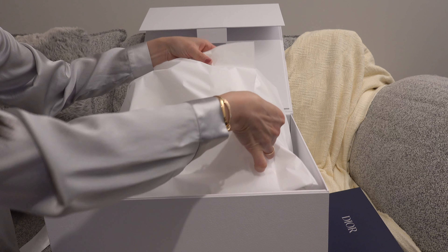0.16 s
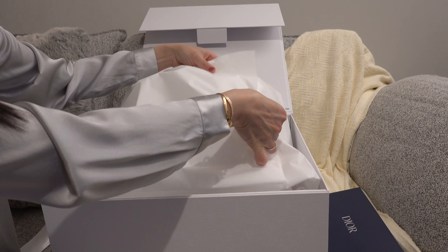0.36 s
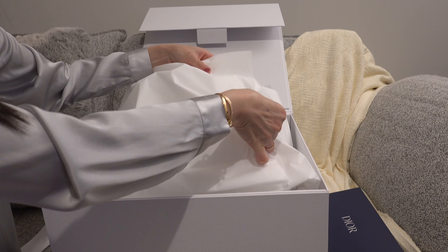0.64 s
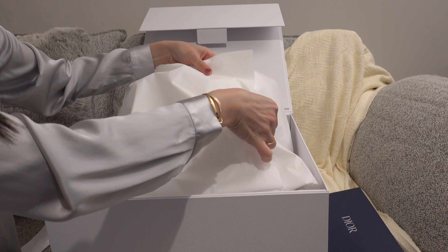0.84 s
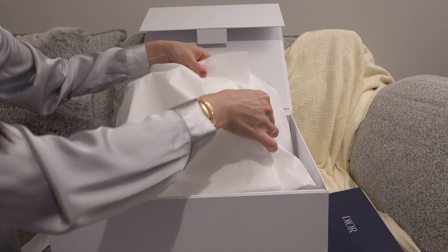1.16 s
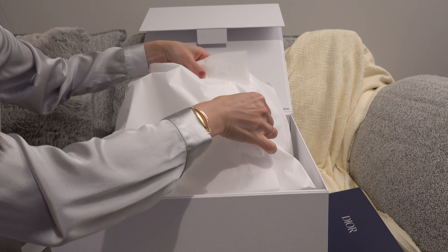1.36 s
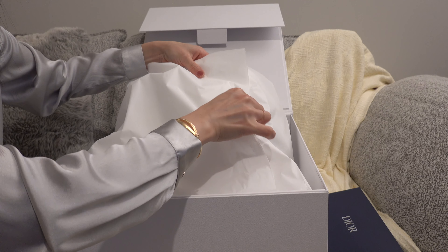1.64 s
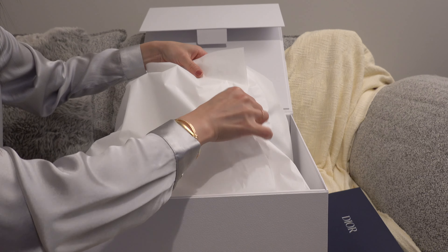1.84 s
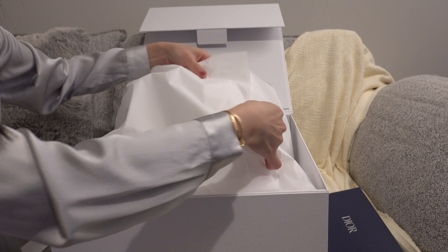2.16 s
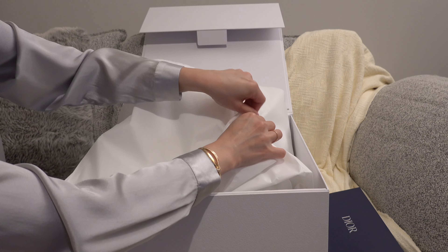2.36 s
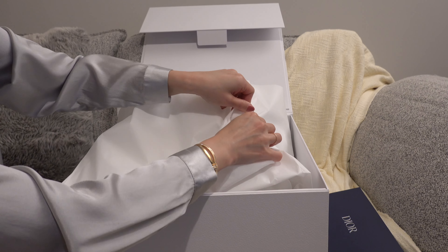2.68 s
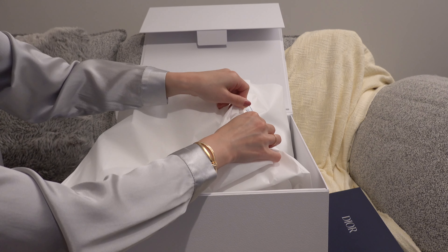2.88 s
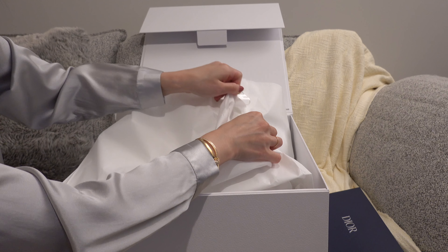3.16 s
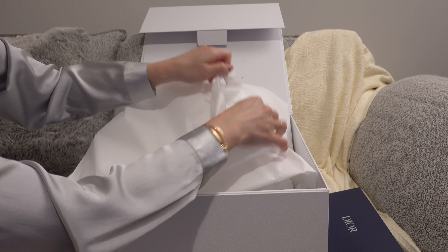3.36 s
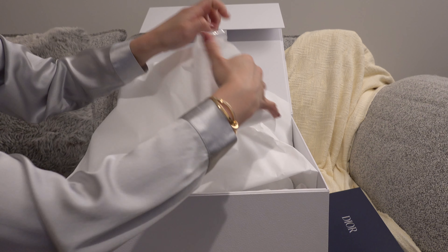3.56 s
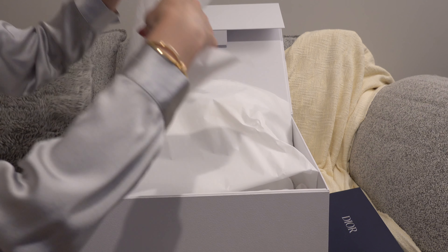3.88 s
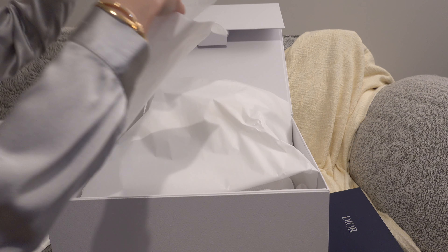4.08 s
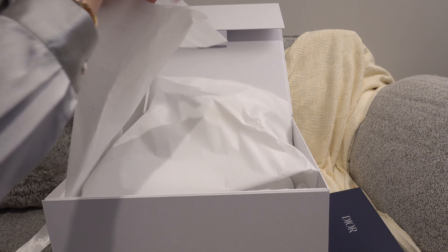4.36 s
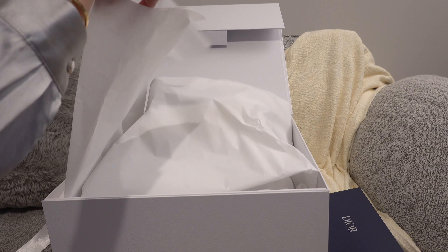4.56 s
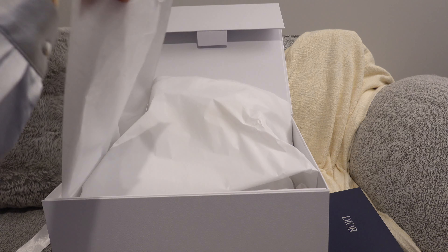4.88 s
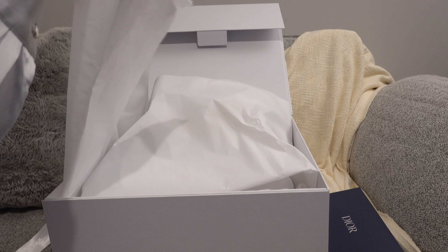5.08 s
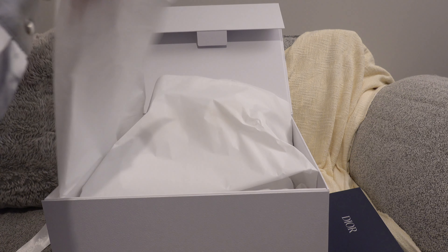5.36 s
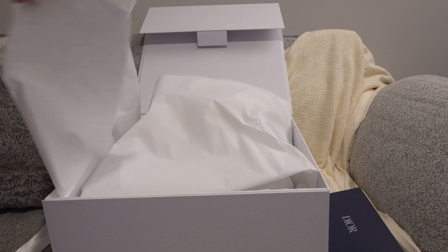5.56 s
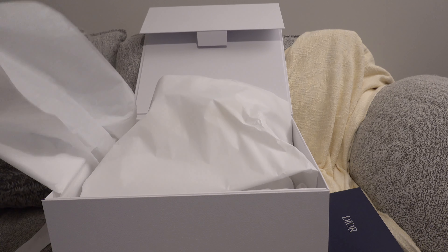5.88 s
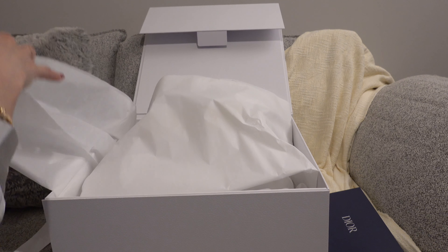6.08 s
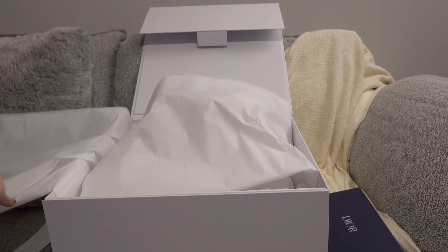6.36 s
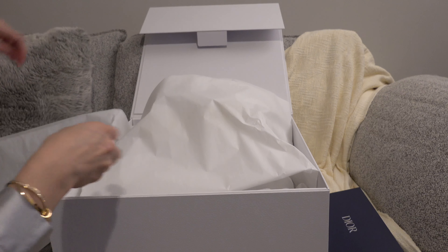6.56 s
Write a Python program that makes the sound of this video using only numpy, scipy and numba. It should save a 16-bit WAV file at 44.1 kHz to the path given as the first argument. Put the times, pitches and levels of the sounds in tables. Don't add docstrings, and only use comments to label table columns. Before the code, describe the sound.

Thin tissue paper is handled close to a stereo phone microphone in a small, softly furnished room. Irregular pinches make fine dense crackle with bright ticks and duller pops. Around four seconds a stronger pull lifts the sheet with a crisp rush, followed by lighter crinkles and smooth sliding hisses as it is laid aside. A very faint low hum lies underneath.

```python
import sys
import numpy as np
from scipy import signal
from scipy.fft import rfft, irfft
from scipy.io import wavfile
from scipy.ndimage import uniform_filter1d
from numba import njit

SR = 44100
rng = np.random.default_rng(int(sys.argv[2]) if len(sys.argv) > 2 else 0)


def wav_out(sig):
    wavfile.write(sys.argv[1], SR, np.round(np.clip(np.atleast_2d(sig).T, -1, 1) * 32767).astype(np.int16))


def invert_db(level):
    return 10 ** (np.asarray(level, dtype=float) / 20)


N = 296352

# (frequency [Hz], density [dB])
HUM_SPECTRUM = [(15, -54), (25, -27), (166, -7.5), (212, -39), (253, 4), (380, -29.5), (454, -7),
                (762, -20), (1200, -2.5), (1560, -35), (2640, -120)]
# (frequency [Hz], width [Hz], level [dB])
ROOM_MODES = [(215.5, 10, -60.5), (177, 15, -70.5), (309, 27, -63.5), (384, 25, -60.5)]
# (time [s], rustle level [dB], sliding against crackle [dB])
DRAG = [(-0.0, -33.5, -5.5), (0.74, -34.5, -2.5), (0.997, -41.5, -12), (1.26, -36.5, -6.0),
        (1.91, -39, -4.5), (2.281, -49.5, -9.5), (2.731, -33, -4.5), (3.283, -37, -3.5),
        (3.618, -40.4, -4.5), (3.99, -30.5, 6), (4.423, -40, -4.5), (4.901, -37.5, -3.0), (5.16, -45, -2.5),
        (5.465, -31.4, 8), (5.905, -36.5, 2.0), (6.366, -32.0, 11), (6.54, -48, 1), (6.72, -50.9, 2.0)]
# (start [s], hold [s], level [dB], crispness [dB])
PINCHES = [(0.046, 0.0, -31, -0.5), (0.179, 0.027, -28, -7.5), (0.317, 0.085, -28, -4), (0.42, 0, -29, 2),
           (0.519, 0.066, -29.5, 0.5), (0.601, 0, -29.1, -7.0), (0.762, 0.067, -30.0, -3),
           (0.86, 0.012, -30.2, -3), (1.126, 0.075, -35.5, -2.5), (1.257, 0.0076, -32, -2.5),
           (1.339, 0.0, -51, -4), (1.542, 0.05, -36, -2.5), (1.666, 0.037, -27.5, -5),
           (1.781, 0.019, -35.5, -2.5), (1.965, 0.02, -31.5, -2), (2.029, 0.084, -31, -4),
           (2.195, 0.028, -28, -4.5), (2.303, 0.017, -33.5, -3), (2.412, 0.00017, -27, -0.2),
           (2.482, 0.032, -31.5, -3), (2.604, 0.014, -38, -0.3), (2.68, 0, -29, -4),
           (2.74, 0.00033, -30.5, 1), (2.827, 0.09, -33.0, -3.5), (2.963, 0.001, -30.5, 0),
           (3.051, 0.048, -34.5, -2), (3.136, 0.022, -28, 0.5), (3.347, 0.026, -37.5, 0.8),
           (3.415, 0.067, -35.5, -1.8)]
# (start [s], hold [s], level [dB], crispness [dB])
PULLS = [(3.649, 0.0049, -30, 2.5), (3.723, 0.002, -34, -1), (3.862, 0.054, -26.5, 1.2),
         (3.94, 0.089, -22.5, 1.5), (4.118, 0.0099, -46, 11.5), (4.202, 0.016, -32.5, -2.5),
         (4.445, 0.034, -44, 8), (4.585, 0.043, -30, -2.5), (4.665, 0.027, -30.5, 2.2),
         (4.734, 0.02, -32.9, 3), (4.84, 0.027, -32.3, 1), (5.092, 0.001, -49.5, 3.8),
         (5.267, 0.025, -37.2, -0.5), (5.327, 0.037, -32.5, -1), (5.391, 0.07, -28, -1.8),
         (5.486, 0.083, -31, -1), (5.653, 0.002, -46, 11), (5.797, 0.034, -35.5, -6),
         (5.924, 0.082, -40.5, -13), (6.075, 0.011, -34, -16), (6.305, 0.14, -37.5, -5.5),
         (6.539, 0.001, -38.5, -13), (6.597, 0.003, -43, -7)]
# (frequency [Hz], density [dB])
PAPER_SPECTRUM = [(35, -57), (60, -19.5), (224, -4.5), (393, -4), (509, -7.5), (573, -5.5), (1010, -9.5),
                  (2400, -0.5), (3180, -3), (4980, -14), (10100, -6), (15400, -14.5), (16500, -20)]
# (time [s], peak level [dB], frequency [Hz])
PINCH_CRACKS = [(0.0366, -17, 9920), (0.1416, -16, 10900), (0.1965, -13.5, 10800), (0.256, -16, 10100),
                (0.415, -18, 10300), (0.479, -13.5, 8700), (0.54, -8, 9700), (0.5921, -17, 6600),
                (0.81, -11, 8830), (0.8565, -19, 9050), (0.985, -22.5, 9400), (1.1187, -17.5, 10000),
                (1.3388, -14.5, 9630), (1.4144, -17.5, 11000), (1.4734, -20, 8700), (1.6642, -11, 9600),
                (1.7015, -18, 8240), (1.9589, -17, 8450), (2.2837, -17.5, 8060), (2.3984, -18, 9320),
                (2.467, -15, 10200), (2.679, -16, 8360), (2.7418, -14.5, 8440), (2.821, -14, 10100),
                (2.8737, -15, 8400), (2.9507, -14, 9700), (3.0732, -16.5, 8900), (3.1293, -7.5, 9760),
                (3.244, -24, 7340), (3.5381, -16, 10400)]
# (time [s], peak level [dB], frequency [Hz])
LIFT_CRACKS = [(3.6223, -22, 9080), (3.6363, -14.5, 9350), (3.7262, -15.5, 7300), (3.8248, -19, 10500),
               (3.8438, -15, 9970), (3.8682, -6, 10100), (4.195, -17, 9900), (4.3036, -17, 9250),
               (4.3404, -18, 9800), (4.388, -25, 9280), (4.4149, -33, 8830), (4.4374, -17, 7240),
               (4.5377, -18, 8500), (4.5762, -11, 9990), (4.61, -10.5, 9980), (4.6523, -17, 10400),
               (4.7317, -16, 8290), (4.8016, -19, 8260), (4.8445, -18, 10600), (4.8905, -19, 8770),
               (5.0779, -25, 10200), (5.2376, -22.5, 9360), (5.2947, -15.5, 9930), (5.5708, -18, 10400),
               (5.6521, -16, 8550), (5.916, -19, 10500), (5.9744, -21, 8600), (6.2962, -15, 12200),
               (6.5334, -24.5, 9900), (6.596, -25.5, 7300)]
# (time [s], peak level [dB], frequency [Hz])
POPS = [(0.196, -15, 2720), (0.254, -15.5, 2700), (0.3164, -22, 2230), (0.5859, -8, 2270),
        (1.1184, -21, 3010), (1.2058, -18, 2390), (1.2286, -22, 2950), (1.298, -17.5, 3250),
        (1.475, -20, 2380), (1.5075, -13, 2250), (1.5435, -10.5, 2900), (1.927, -19.5, 2000),
        (2.2014, -14, 2530), (2.2832, -19, 2530), (2.3104, -24, 2660), (2.3785, -18, 2490),
        (2.4064, -21, 2410), (2.4818, -13, 3940), (2.6798, -19, 2690), (2.9602, -26, 3300),
        (3.0794, -17, 3660), (3.1303, -10.5, 2090), (3.2625, -26, 1670), (3.845, -9, 3080),
        (4.438, -20, 2870), (4.5755, -18, 2060), (4.6198, -10, 3080), (4.6518, -24, 2420),
        (4.8489, -15, 2530), (5.916, -16, 2770)]
# (frequency [Hz], level [dB])
STEREO_WIDTH = [(60, -21), (200, -26), (700, -12), (1290, -14), (2380, -17), (4400, 2.5), (8120, -1.5),
                (13000, -1), (15000, -7)]


def unit(x):
    return x / np.sqrt(np.mean(x[0] ** 2))


def gain_at(points, hz):
    point_hz, db = np.transpose(points)
    return invert_db(np.interp(np.log(hz + 1), np.log(point_hz + 1), db))


def colour(x, gain):
    size = x.shape[-1]
    hz = np.arange(size // 2 + 1) * SR / size
    return irfft(rfft(x) * gain(hz), size)


def slope(hz, edge_hz):
    return 1 / np.sqrt(1 + (edge_hz / (hz + 1)) ** 8)


def walk(rate_hz):
    hold = int(SR / rate_hz)
    steps = np.repeat(rng.standard_normal(N // 50 + 1), hold)[:N]
    return 1.04 * uniform_filter1d(steps, hold)


def curves(table):
    s, *columns = np.transpose(table)
    return (np.interp(np.arange(N) / SR, s, column) for column in columns)


def dying(start, gain, fade_s):
    kicks = np.bincount(start, gain ** 2, N)[:N]
    return np.sqrt(signal.lfilter([1], [1, -np.exp(-2 / (fade_s * SR))], kicks))


@njit
def grains(start, hz, cycles, gain, n):
    out = np.zeros((2, n))
    for k in range(len(start)):
        turn = np.exp((2j * np.pi - 1 / cycles[k]) * hz[k] / SR)
        z = 1 + 0j
        for i in range(start[k], min(n, start[k] + int(6 * cycles[k] * SR / hz[k]))):
            out[0, i] += gain[0, k] * z.imag
            out[1, i] += gain[1, k] * (z * turn).real
            z *= turn
    return out


def hum():
    rumble = colour(rng.standard_normal((2, N)), lambda hz: gain_at(HUM_SPECTRUM, hz))
    air = invert_db(-56) * unit(rumble)
    for mode_hz, width_hz, db in ROOM_MODES:
        mode = colour(rng.standard_normal((2, N)), lambda hz: 1 / (1 + (2 * (hz - mode_hz) / width_hz) ** 2))
        air = air + invert_db(db) * unit(mode)
    return air + invert_db(-55.5) * rng.standard_normal((2, N))


def hands():
    attack_db_per_s, release_db_per_s, drag_crisp_db = 330, 240, -4
    drag_db, slide_db = curves(DRAG)
    t = np.arange(0, N, 64) / SR
    s, hold_s, db, crispness_db = np.transpose(np.vstack([PINCHES, PULLS]))[:, :, None]
    db = db - attack_db_per_s * np.maximum(s - t, 0)
    db = db - release_db_per_s * np.maximum(t - s - hold_s, 0)

    def total_power(db):
        return np.interp(np.arange(N) / SR, t, np.sum(invert_db(db) ** 2, axis=0))

    body_db = 10 * np.log10(invert_db(drag_db) ** 2 + total_power(db))
    crisp_db = 10 * np.log10(invert_db(drag_db + drag_crisp_db) ** 2 + total_power(db + crispness_db))
    return body_db, crisp_db, slide_db


def crackle(creases=30000, scatter_db=2.0, top_db=16.0, runs_db=3.0, run_s=0.015, calm=1.0):
    onset, strength = rng.random((creases // 80, 2)).T
    run_gain = invert_db(-runs_db * np.log(1 - strength))
    runs = calm + dying((onset * N).astype(np.int64), run_gain, run_s)
    when, pitch, size, side, sign = rng.random((creases, 5)).T
    start = (when * N).astype(np.int64)
    hz = 300 * 50 ** (pitch ** .5)
    db = -scatter_db * np.log(1 - size) + 20 * np.log10(runs[start])
    db = top_db * np.tanh(db / top_db)
    gain = invert_db(db) * np.array([np.sign(sign - .5), 0.72 * (side - .5)])
    x = grains(start, hz, .5 + hz / 8000, gain, N)
    bin_hz, power = signal.welch(x[0], SR, nperseg=256)
    return unit(colour(x, lambda hz: gain_at(PAPER_SPECTRUM, hz) / np.sqrt(np.interp(hz, bin_hz, power))))


def sliding(flicker_db=0.5):
    hiss = colour(rng.standard_normal((2, N)), lambda hz: gain_at(PAPER_SPECTRUM, hz))
    return unit(hiss * invert_db(-flicker_db * walk(30)))


def hush(s):
    ahead = dying(N - 1 - (s * SR).astype(np.int64), np.ones(len(s)), fade_s=0.028)[::-1]
    return invert_db(-2.5 * np.minimum(ahead, 1))


def aftermath(s, peak_db):
    return dying(((s + 0.00052) * SR).astype(np.int64), invert_db(peak_db - 21), fade_s=0.011)


def rustle(db, crisp_db, slide_db):
    low_hz, high_hz = 1000, 5000
    slide = invert_db(slide_db)
    x = (crackle() + slide * sliding()) / np.sqrt(1 + slide ** 2)
    flap = colour(x, lambda hz: np.sqrt(1 - slope(hz, low_hz) ** 2))
    body = colour(x, lambda hz: slope(hz, low_hz) * np.sqrt(1 - slope(hz, high_hz) ** 2))
    crisp = colour(x, lambda hz: slope(hz, high_hz))

    flap_base_db, follow, usual_db, lag_s = -48.5, 0.69, -33, 0.087
    slack_db = 3.0 * (np.arange(N) < 0.88 * SR)
    flap_db = uniform_filter1d(flap_base_db + follow * (db - usual_db) + slack_db, int(lag_s * SR))

    pop_s, pop_db, _ = np.transpose(POPS)
    crack_s, crack_db, _ = np.transpose(np.vstack([PINCH_CRACKS, LIFT_CRACKS]))
    body_gain = np.hypot(hush(pop_s) * invert_db(db - 2), aftermath(pop_s, pop_db))
    crisp_gain = np.hypot(hush(crack_s) * invert_db(crisp_db - 0.83), aftermath(crack_s, crack_db))
    return body_gain * unit(body) + crisp_gain * unit(crisp) + invert_db(flap_db) * unit(flap)


def lesser(level_db, over_db, scatter_db, low_hz, high_hz, count):
    when, size, pitch = rng.random((count, 3)).T
    db = level_db[(when * N).astype(np.int64)] + over_db - scatter_db * np.log(1 - .95 * size)
    return np.transpose([when * N / SR, db, low_hz * (high_hz / low_hz) ** pitch])


def snaps(table, cycles, first_db, step_db, spread_s):
    s, db, hz = np.transpose(table)
    out = 0
    for k in range(5):
        later = k > 0
        side, lag, detune, size = rng.random((len(s), 4)).T
        start = ((s + .0008 + spread_s * (k + lag - .5) * later) * SR).astype(np.int64)
        pitch_hz = np.minimum(hz * (1 + .5 * (detune - .5) * later), 15500)
        jump_db = db + first_db + step_db * k * (1 + size)
        gain = invert_db(jump_db) * np.array([np.ones(len(s)), 0.67 * (side - .5)])
        ring = np.full(len(s), cycles if later else 1.35)
        out = out + grains(start, pitch_hz, ring, gain, N)
    return colour(out, lambda hz: slope(hz, 610))


def room(x, spots=8):
    t = np.arange(SR // 3) / SR

    def fade(t60):
        return 10 ** (-3 * t / t60) / np.sqrt(t60 * SR / np.log(1e6))

    box = invert_db([[-8], [-10]]) * fade(0.035) * (t > .001)
    walls = invert_db([[-12], [-1]]) * fade(0.21) * (t > .004)
    spot = np.repeat(rng.integers(0, spots, N // 256 + 1), 256)[:N]
    wet = 0
    for k in range(spots):
        echo = rng.standard_normal((2, len(t))) * np.hypot(box, walls)
        source = x[:1] * uniform_filter1d(1. * (spot == k), 64)
        wet = wet + signal.fftconvolve(source, echo, axes=1)[:, :N]
    direct = x * np.array([[1], [0.9]])
    return direct + colour(wet, lambda hz: slope(hz, 195))


def scene():
    db, crisp_db, slide_db = hands()
    paper = rustle(db, crisp_db, slide_db)
    small_cracks = lesser(crisp_db, over_db=11.5, scatter_db=3, low_hz=7200, high_hz=10700, count=100)
    small_pops = lesser(db, over_db=9, scatter_db=2.2, low_hz=2170, high_hz=3450, count=60)
    cracks = np.vstack([PINCH_CRACKS, LIFT_CRACKS, small_cracks])
    pops = np.vstack([POPS, small_pops])
    folds = snaps(cracks, cycles=2.9, first_db=5, step_db=-3.5, spread_s=0.00047)
    folds = folds + snaps(pops, cycles=5.9, first_db=0.35, step_db=-10.5, spread_s=0.00114)
    mid, side = room(paper + folds) + hum()
    aim = 0.25 + 0.28 * walk(4)
    side = 0.86 * side + aim * np.gradient(mid)
    side = colour(side, lambda hz: gain_at(STEREO_WIDTH, hz)) + 0.022 * mid
    return np.array([mid + side, mid - side])


def low_pass(x):
    return signal.sosfilt(signal.butter(12, 17030, fs=SR, output="sos"), x)


def record(dry):
    rounded = np.tanh(1.329 * dry) / 1.247
    top_cut = signal.ellip(10, .2, 70, 15860, fs=SR, output="sos")
    return low_pass(signal.sosfilt(top_cut, rounded))


dry = scene()
out = record(dry)
wav_out(out)
```